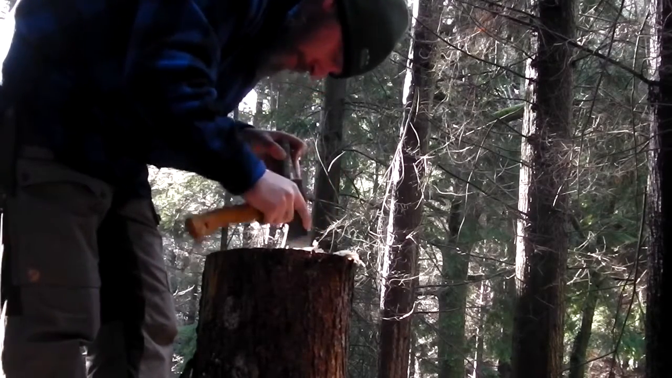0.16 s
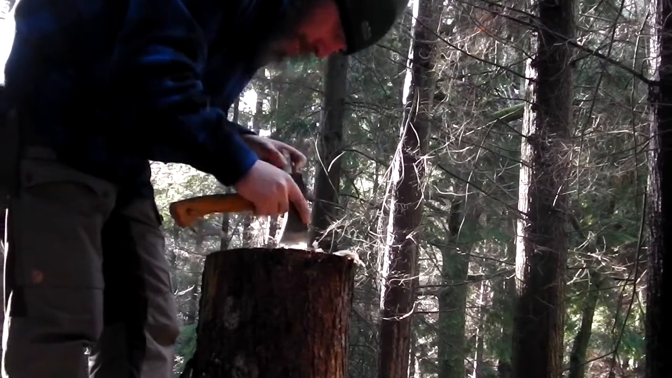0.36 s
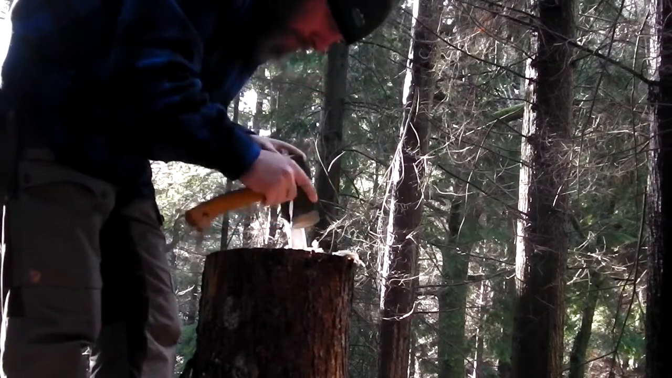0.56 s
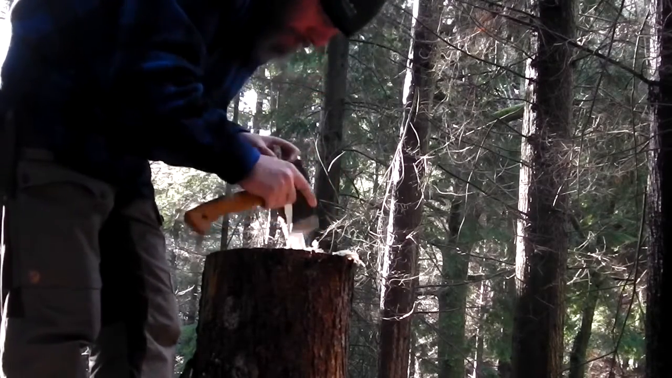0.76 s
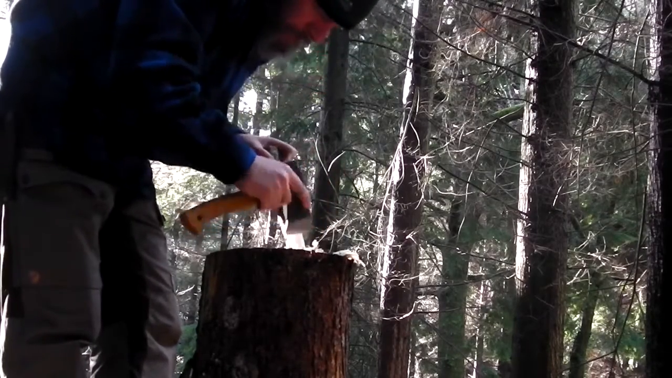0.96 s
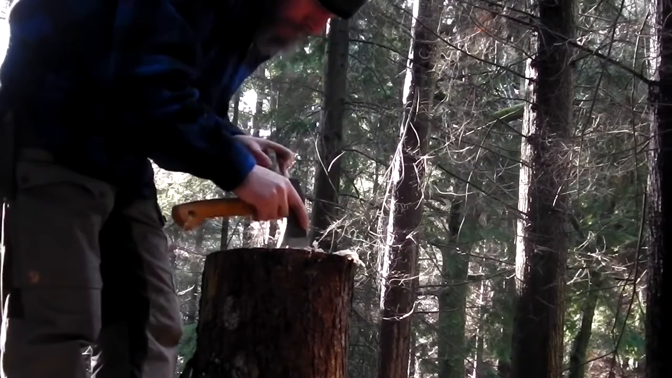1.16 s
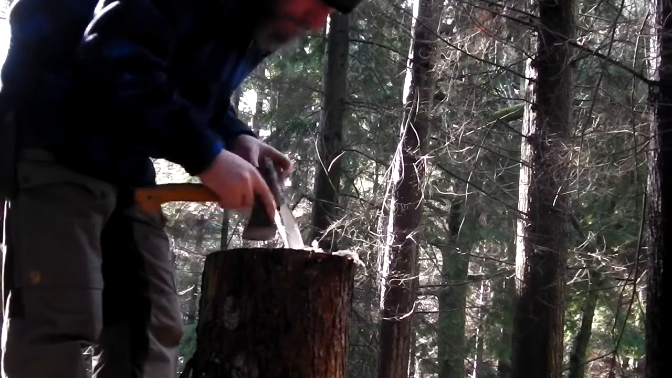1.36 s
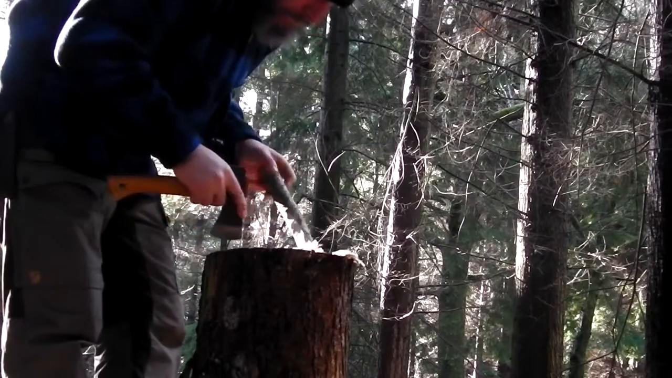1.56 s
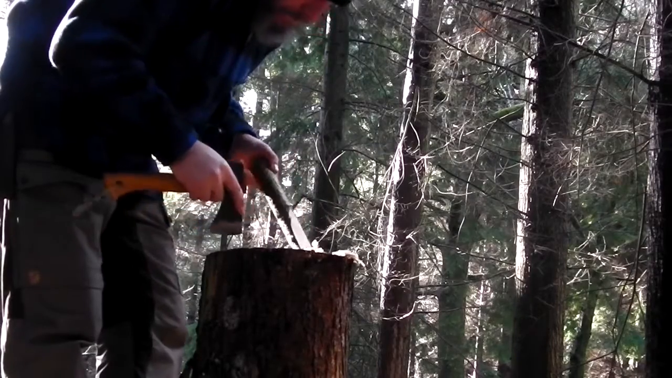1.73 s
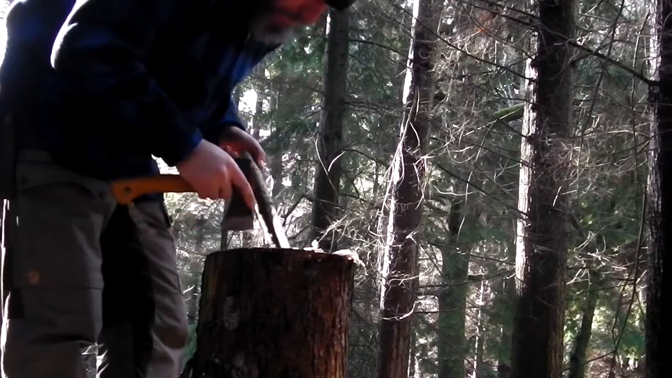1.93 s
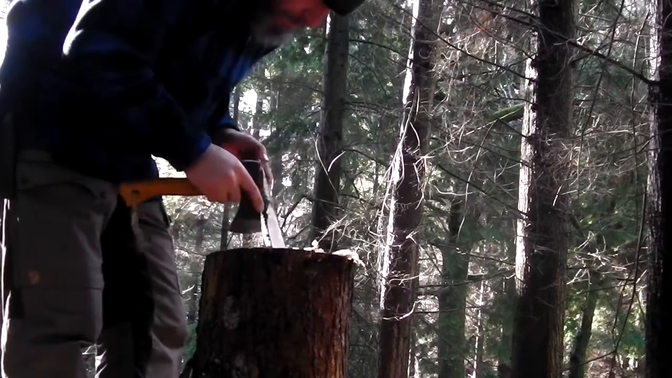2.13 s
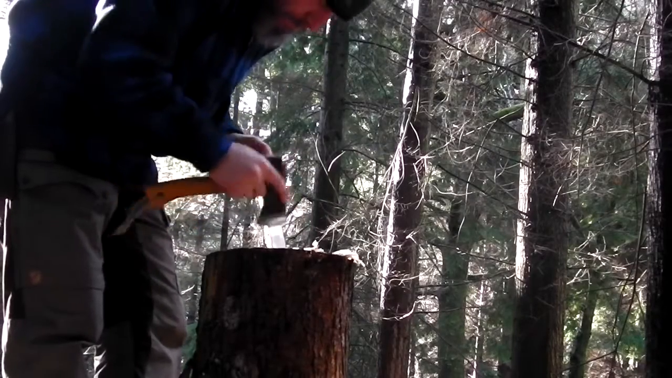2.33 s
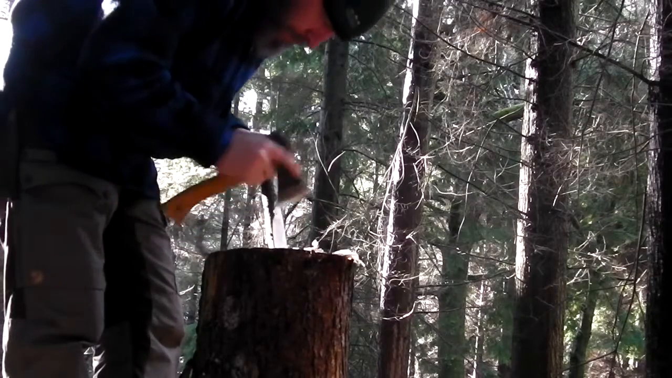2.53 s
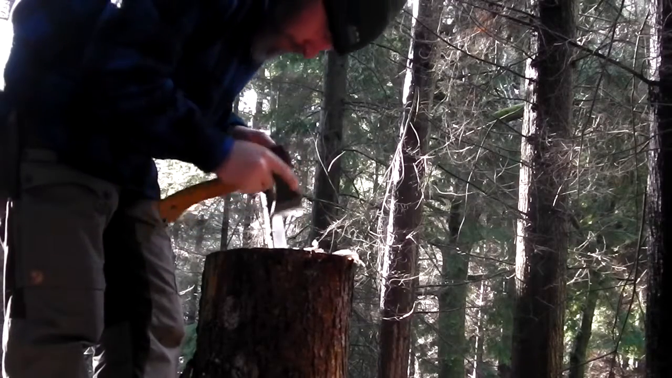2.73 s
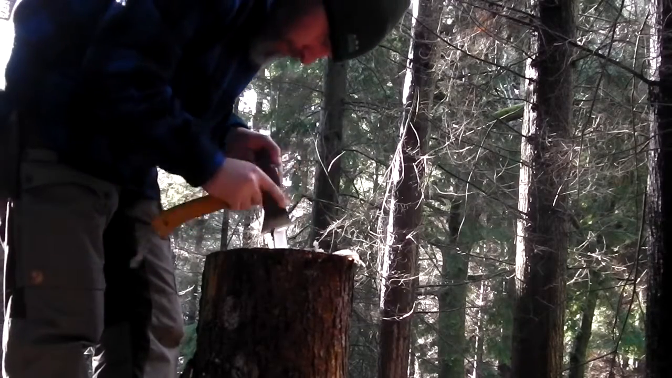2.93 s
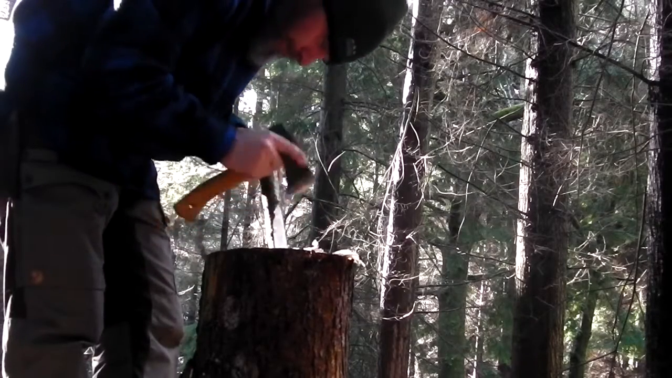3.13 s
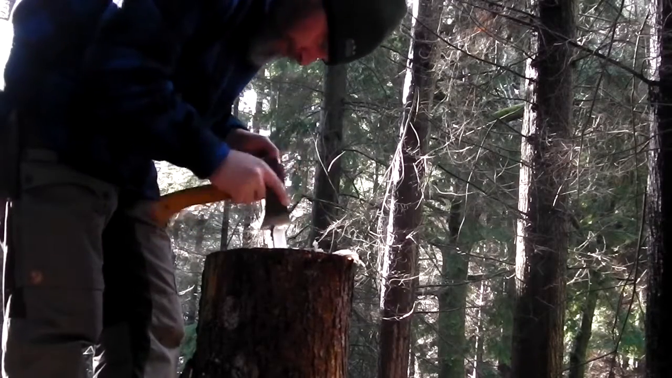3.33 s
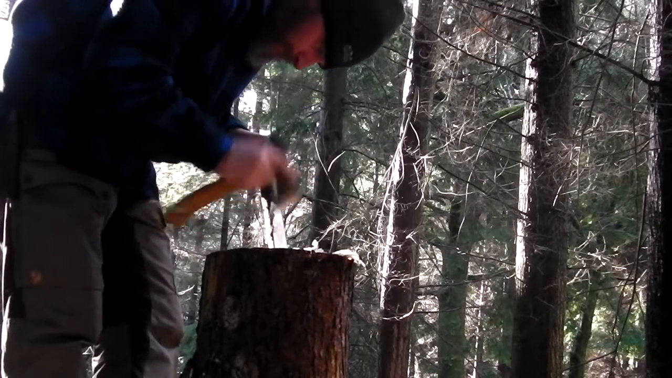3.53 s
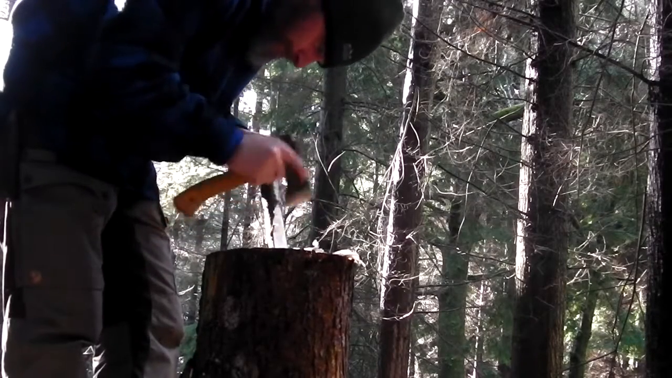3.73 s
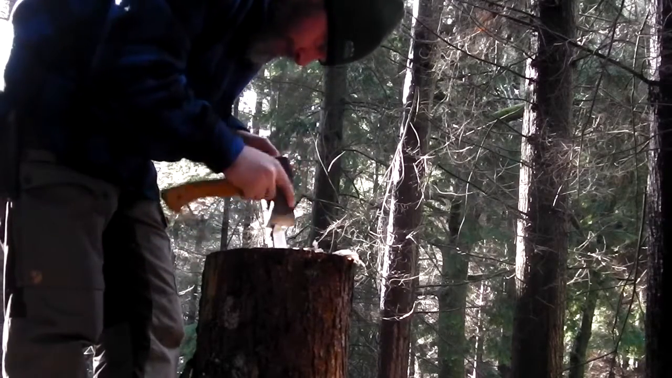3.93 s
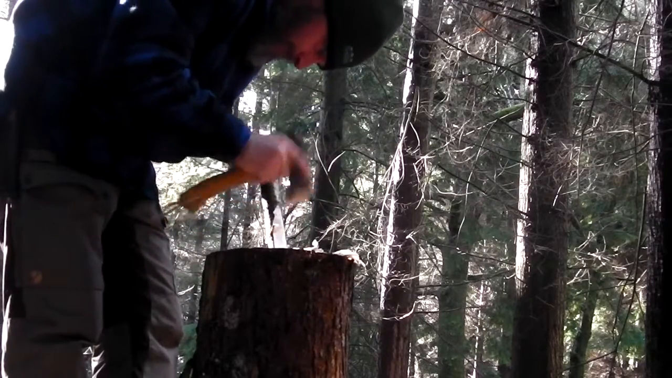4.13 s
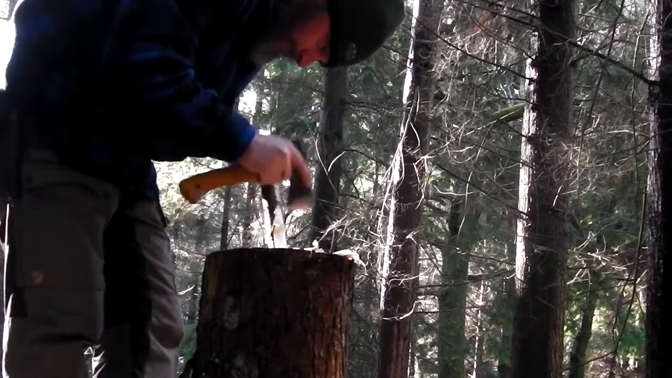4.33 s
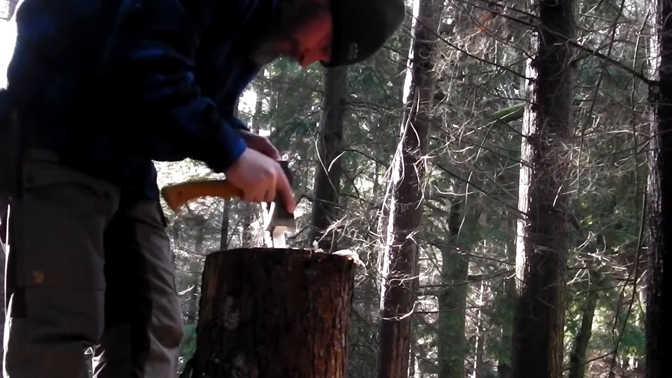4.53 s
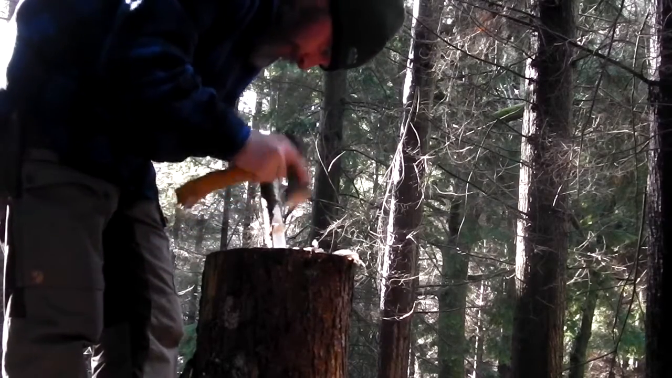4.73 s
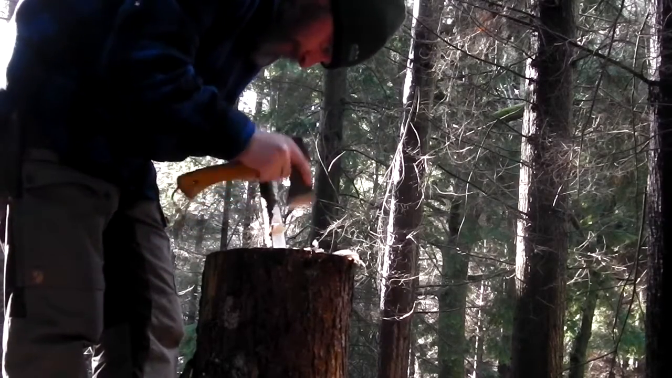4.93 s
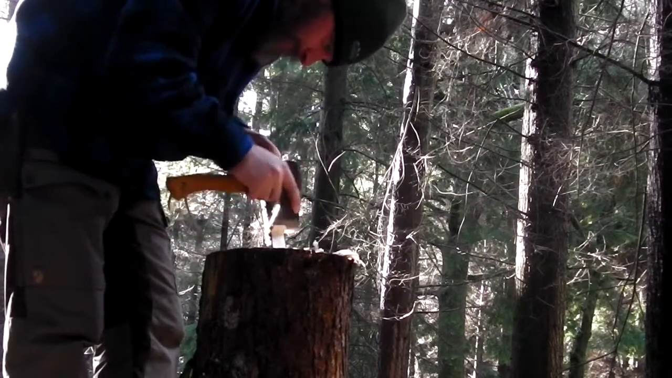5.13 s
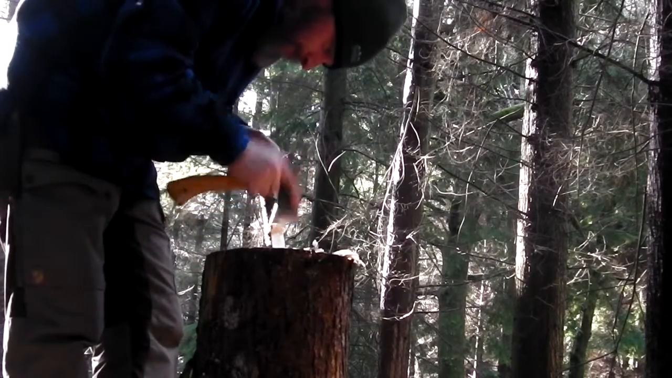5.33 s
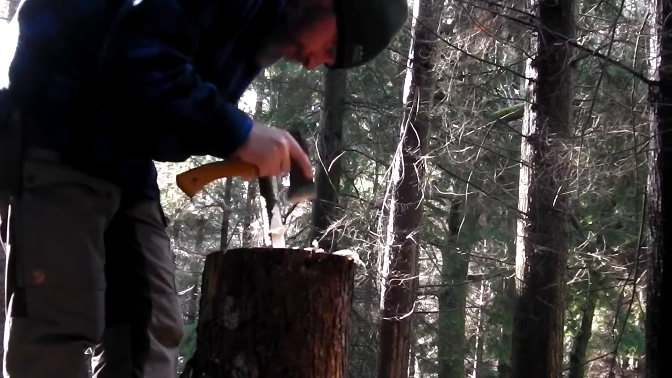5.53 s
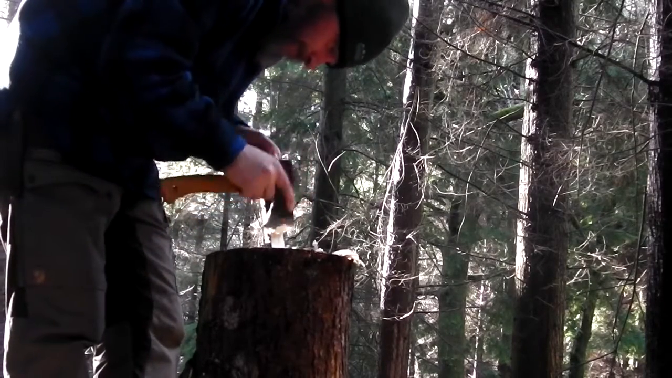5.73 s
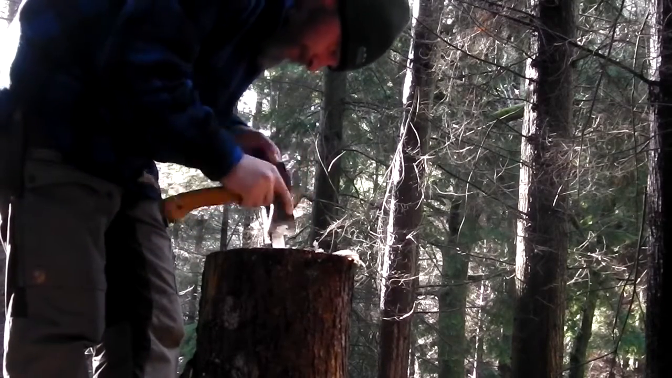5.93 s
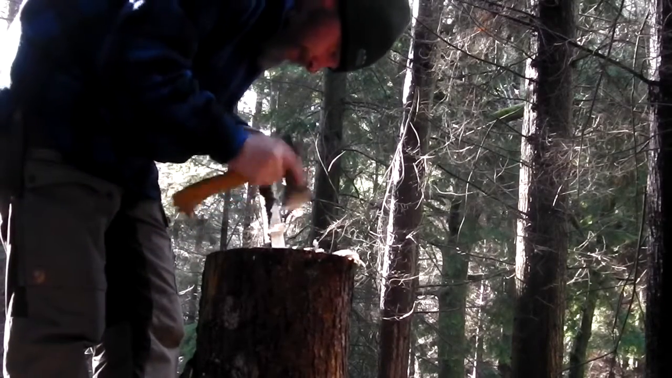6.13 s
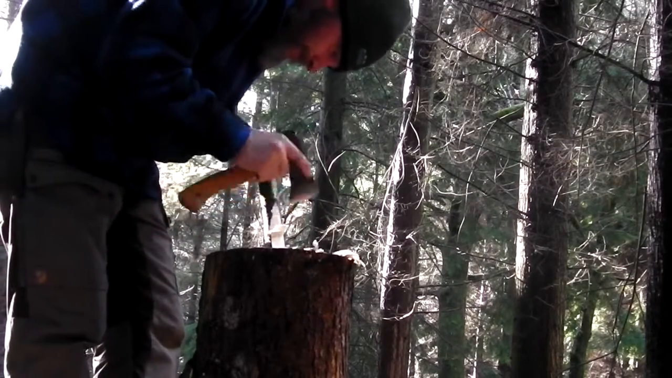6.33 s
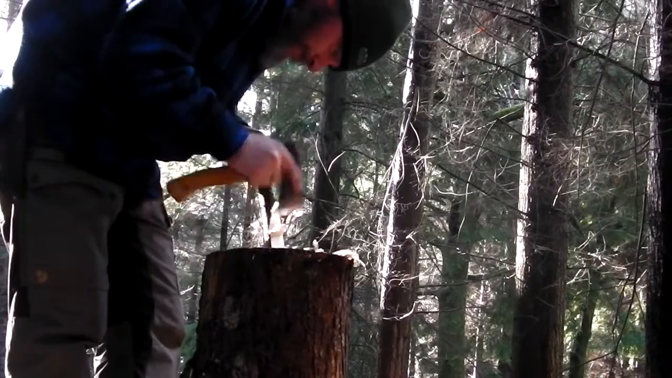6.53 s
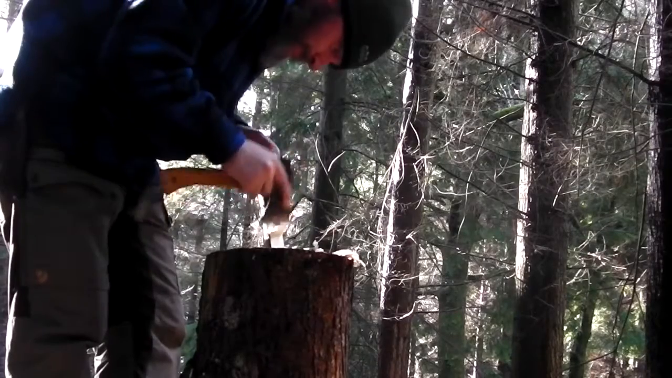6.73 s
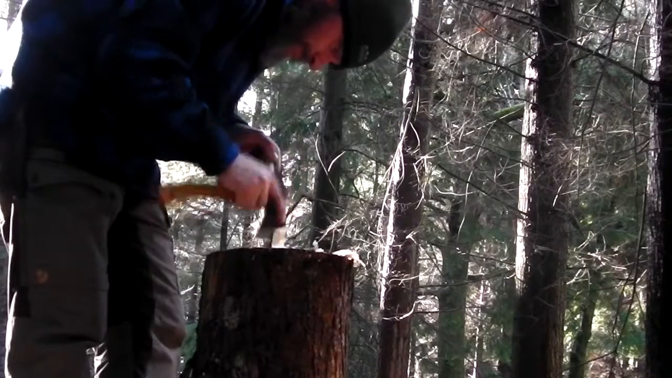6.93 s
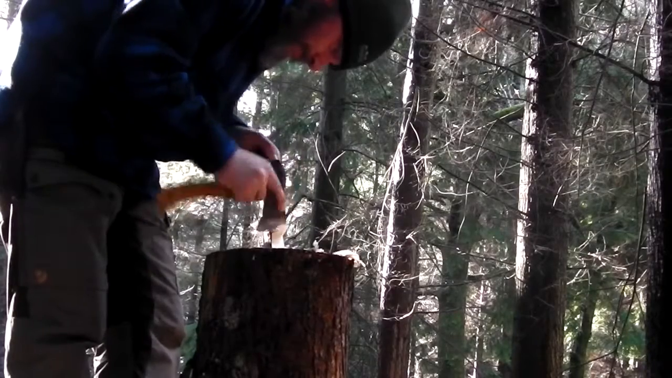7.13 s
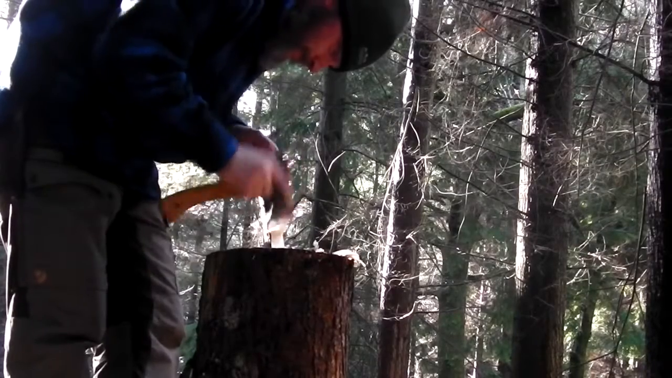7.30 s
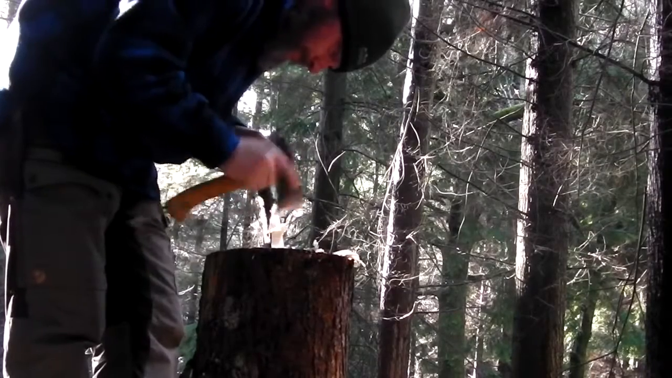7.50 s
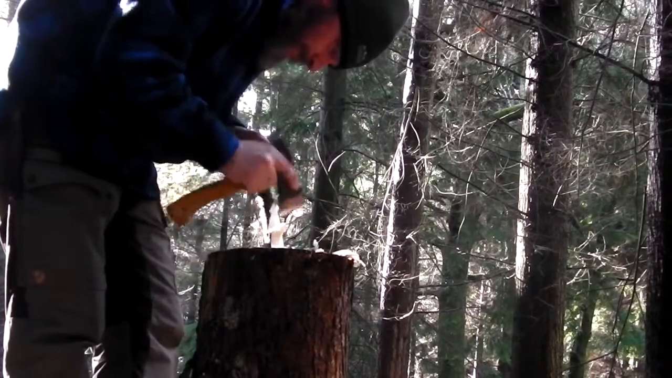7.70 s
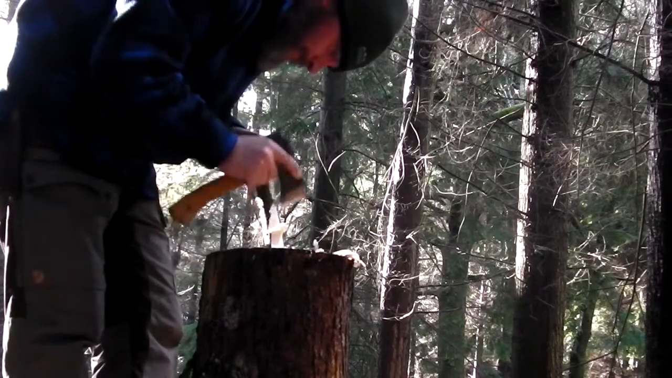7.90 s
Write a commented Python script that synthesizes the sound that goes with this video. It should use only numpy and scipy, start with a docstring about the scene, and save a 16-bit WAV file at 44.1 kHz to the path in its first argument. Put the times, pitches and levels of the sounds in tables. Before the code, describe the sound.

A small hatchet shaves a stick on a log in a forest, about a pace from a stereo microphone. Four light, dry knocks with tearing fibres come first, then a pause. A steady run of strokes follows, quickening and growing into hard clacks near the end, each with a short echo off the trees. Distant traffic and wind hum softly behind, with a few very faint bird whistles.

```python
"""A small hatchet, held near its head, shaves a stick on a log in a wood, a pace from a stereo camera.
Over the hum of far traffic and wind in the crowns come four light strokes: each knocks stick, log and
blade while fibres tear, and ground and trunks send it back. A far bird whistles faintly near 0.8 s and
in the pause that follows. From 2.6 s a steady run of strokes quickens; the arm puffs softly and the bird
calls once more near 4.9 s. The hardest clacks land between 6.4 and 7.6 s, over a swollen traffic drone."""
import sys
import numpy as np
from scipy import signal
from scipy.fft import rfft, irfft, next_fast_len
from scipy.io import wavfile
from scipy.ndimage import uniform_filter1d

SR = 44100
rng = np.random.default_rng(int(sys.argv[2]) if len(sys.argv) > 2 else 0)


def master(y):
    """Save y as 16-bit WAV."""
    cut = np.clip(np.atleast_2d(y).T, -1, 1)
    pcm = np.round(cut * 32767)  # scale
    wavfile.write(sys.argv[1], SR, pcm.astype(np.int16))


N = 355432

# Blade contacts, first bites and the stops just after: start_s, knock_db, clack_db, splinter_db, thud_db
CONTACTS = [(0.134, -25.5, -23, -53, -36), (0.652, -24, -18.5, -56, -36), (0.667, -45, -35, -55, -49),
            (0.675, -55, -39, -50, -51), (0.858, -28.5, -25, -58, -33.5), (0.879, -47, -42, -47, -52),
            (1.043, -30, -25.5, -61, -33.5), (1.071, -50, -43, -54, -42), (1.085, -51, -49, -65, -38),
            (2.614, -21, -31.5, -51, -29), (2.939, -19.5, -20.5, -36.5, -41), (2.943, -31, -25, -56, -35),
            (3.269, -21.5, -19, -37, -31), (3.592, -19.5, -19, -44, -31.5), (3.599, -36, -26, -41, -39.5),
            (3.894, -16, -15.5, -38, -29.5), (4.201, -17.5, -17.5, -42.5, -29.5),
            (4.501, -15.5, -13.5, -46, -40), (4.51, -31, -28, -45, -41), (4.516, -36, -31, -54, -33),
            (4.799, -18, -17.5, -46, -36), (4.813, -35, -27, -48, -28), (5.09, -21.5, -18, -50, -29.5),
            (5.096, -37, -32, -43.5, -57), (5.109, -53, -41, -58, -36.5), (5.373, -18.5, -19, -55, -32),
            (5.388, -29.5, -26.5, -40, -35), (5.394, -36, -30, -45, -35.5), (5.666, -17.5, -14, -46.5, -35),
            (5.68, -36, -20, -45.5, -35), (5.952, -22, -22.5, -44, -31), (5.962, -35, -31, -54, -32.5),
            (6.201, -20, -21, -41.5, -32), (6.212, -24, -21.5, -51, -28.5), (6.449, -18, -7.5, -34.5, -25),
            (6.678, -19, -13.5, -43.5, -29.5), (6.692, -16.5, -19.5, -47, -23), (6.699, -36, -41, -56, -31),
            (6.913, -17.5, -8, -38, -37), (6.926, -27.5, -20.5, -33.5, -27.5),
            (7.129, -15, -4, -28.5, -30.5), (7.354, -17.5, -2.5, -36, -36.5),
            (7.57, -16.5, -6.5, -39.5, -29), (7.779, -17.5, -17.5, -48, -33.5),
            (7.99, -16.5, -11.5, -46.5, -27.5)]
# Modes per layer (stick knock, edge clack, crack, splinter, log thud): pitch_hz, level_db, t60_s
LAYER_MODES = [
    [(662, 8, 0.0096), (780, -19, 0.0047), (930, 14, 0.021), (980, -28, 0.017)],
    [(1700, 2.5, 0.011), (2110, -10, 0.0037), (2024, 7.5, 0.016), (2326, 2.5, 0.025), (2436, 16, 0.0085),
     (2800, -28, 0.0073), (2917, 14, 0.0098), (3320, -3, 0.016)],
    [(3690, -3, 0.0073), (4417, -1, 0.01), (4770, -1.5, 0.0071), (5170, -12, 0.0044), (6040, -6.5, 0.0048),
     (6490, -9.5, 0.013), (7060, -13, 0.0069)],
    [(8600, -3, .003), (10260, -1, .007), (11500, -2, .002), (13000, -4, .002), (14600, -3, .002)],
    [(57.3, -2.5, 0.029), (109, -0.5, 0.043), (169, -14, 0.043), (435, 6.5, 0.012)],
]
# Width and attack of the same five layers: left_minus_right_db, side_share, grit_share, bite_ms
LAYER_VOICING = [(2, 0.033, 0.052, 0.861), (0.5, 0.2, 0.61, 0.915), (-1.7, 0.42, 0.55, 0.41),
                 (3, 0.91, .97, 0.075), (1, 0.16, 0.068, 0.9)]
# How strongly the lowest mode of the clack and of the thud sounds, drifting from stroke to stroke:
# time_s, clack_lift_db, thud_lift_db
LOWEST_MODE_DRIFT = [(.7, 8, 14), (.85, 13.5, 2), (1.1, 23, -8), (4.25, -0.5, 18), (4.5, -2, -19.5)]
# Tone of the scatter off the trunks: frequency_hz, gain_db
TRUNK_TONE = [(500, -22), (1100, 0.5), (1800, 2.5), (2300, 0.5), (3100, -3), (3700, -10), (4800, -7.5),
              (6500, -14.5), (9000, -28.5)]
# Air pushed by the swing: start_s, crest_rms_db
SWING_PUFFS = [(1.869, -59), (4.459, -49.5), (4.722, -55), (5.368, -56), (5.611, -48), (6.601, -48.5),
               (6.887, -44)]
# Far bird calls: start_s, end_s, pitch_hz, level_db
WHISTLES = [(.8, 1.0, 3280, -77), (1.76, 1.96, 2830, -74), (4.85, 5.08, 3120, -67)]
# Tone of the traffic and wind bed: frequency_hz, relative_density_db
BED_TONE = [(15, -59), (25, -14), (43, -14), (64, -1), (149, -6), (185, -11.5), (263, -14.5), (405, -6.5),
            (439, -9), (560, -10), (936, -11), (1840, -19.5), (2760, -19.5), (4610, -21.5), (16000, -29.5)]
# Stereo image of the bed: frequency_hz, left_right_likeness (-1 to 1)
BED_LIKENESS = [(60, 0.26), (130, 0.82), (290, 0.41), (640, 0.59), (1410, 0.00032), (3100, -0.42),
                (6820, -0.51), (15000, -0.18)]
# Swell of the traffic drone, counted up from its quietest point: time_s, level_db
DRONE_SWELL = [(0.0, -65), (6.87, -58), (8.06, -61)]

CRACK_FROM_CLACK, CRACK_LIFT_DB = 0.5, 0.4  # the crack is part edge, part fibres
TEAR_MS, HARD_FROM_DB, QUICKER_MS_PER_DB = 2.68, -14, 0.18  # a hard clack shortens the tear
SPLINTER_STRETCH = 1.97  # the finest fibres snap this many times longer
GROUND_MS, GROUND_DB, GROUND_SPREAD_MS = 4.3, -10.5, 3
TRUNKS_DB, TRUNKS_T60_S, TRUNKS_RISE_S = -22, 0.58, 0.0033
SCATTER_FROM_HZ = 1400  # longer waves bend round the thin trunks
THROB_HZ, THROB_DB = 21, 5
BED_DB, BED_PAN_DB = -54, 0.5


def hatchet():
    """Each contact is a short push plus the grit of tearing fibres, rung through five layers of modes."""
    out = np.zeros((2, N + SR))
    t = np.arange(SR // 25) / SR
    push = np.sin(np.pi * np.clip(t / 0.00021, 0, 1))
    push /= np.sqrt(np.sum(push ** 2))
    drift_s, drift_clack_db, drift_thud_db = np.transpose(LOWEST_MODE_DRIFT)
    for start_s, knock, clack, splinter, thud in CONTACTS:
        crack = CRACK_FROM_CLACK * clack + (1 - CRACK_FROM_CLACK) * splinter + CRACK_LIFT_DB
        levels_db = [knock, clack, crack, splinter, thud]
        tear_s = max(TEAR_MS - QUICKER_MS_PER_DB * max(clack - HARD_FROM_DB, 0), .3) / 1000
        spans_s = [tear_s, tear_s, tear_s, tear_s * SPLINTER_STRETCH, tear_s]
        # few large and many small fibre snaps
        snaps = rng.standard_normal((2, len(t))) * undb(3.5 * rng.exponential(size=len(t)))
        jitters = rng.standard_normal((len(LAYER_MODES), 8, 2))
        clack_lift_db = np.interp(start_s, drift_s, drift_clack_db)
        thud_lift_db = np.interp(start_s, drift_s, drift_thud_db)
        lifts_db = [0, clack_lift_db, 0, 0, thud_lift_db]
        onset = int((start_s - .0003) * SR)  # the bite starts just before it is heard
        layers = zip(LAYER_MODES, LAYER_VOICING, levels_db, jitters, lifts_db, spans_s)
        for modes, voicing, level_db, jitter, lift_db, span_s in layers:
            pan_db, side_share, grit_share, bite_ms = voicing
            grit = snaps * t / span_s * np.exp(-t / span_s * 1.66)
            grit /= np.sqrt(np.sum(grit ** 2) / 2)
            body = ring(modes, jitter, bite_ms / 1000, lift_db)
            mid = np.convolve((1 - grit_share) * push + grit_share * grit[0], body)
            mid /= np.max(np.abs(mid))
            side = np.convolve(grit[1], body)
            side *= side_share / np.max(np.abs(side))
            pair = np.array([(mid + side) * undb(pan_db / 2), (mid - side) * undb(-pan_db / 2)])
            out[:, onset:onset + len(mid)] -= undb(level_db) * pair
    return out[:, :N]


def ring(modes, jitter, bite_s, lowest_lift_db, detune=.012, uneven_db=2.2):
    """Modes swell as the edge bites, then ring out; each contact weights and tunes them a little anew."""
    t = np.arange(SR // 12) / SR
    hz, db, t60_s = np.transpose(modes)[:, :, None]
    db = db + uneven_db * jitter[:len(modes), 1:] + lowest_lift_db * (hz == hz.min())
    hz = hz * (1 + detune * jitter[:len(modes), :1])
    # wood swallows a ring within a few dozen cycles, steel less
    t60_s = np.minimum(t60_s, np.where(hz < 3500, 27 / hz, 1))
    tones = np.sin(2 * np.pi * hz * (t - 2 * bite_s))  # in step at the height of the force
    attack = 1 - np.exp(-(t / bite_s) ** 2)
    return attack * np.sum(undb(db) * tones * 1000 ** (-t / t60_s), 0)


def ground_bounce(chops):
    """The rough ground answers each chop with one blurred reflection."""
    t_ms = 1000 * np.arange(SR // 40) / SR
    lateness = (t_ms - GROUND_MS) / GROUND_SPREAD_MS
    smear = rng.standard_normal((1, len(t_ms))) * (lateness > 0) * np.exp(-np.abs(lateness))
    smear /= np.sqrt(np.sum(smear ** 2))
    return undb(GROUND_DB) * signal.fftconvolve(chops, smear, axes=1)[:, :N]


def trunk_scatter(chops):
    """The trunks scatter the chops' treble into a thin tail that builds up and dies away."""
    t = np.arange(SR) / SR
    tail = rng.standard_normal((2, SR)) * undb(3 * wander(150)[:SR])  # single near trunks stand out
    envelope = (1 - np.exp(-(t / TRUNKS_RISE_S) ** 2)) * 1000 ** (-t / TRUNKS_T60_S)
    tail = (tail + .5 * tail[::-1]) * envelope  # crossfeed narrows the image
    tail = irfft(rfft(tail) * undb(curve_at(np.arange(SR // 2 + 1), TRUNK_TONE)), SR)
    tail *= undb(TRUNKS_DB) / np.sqrt(np.sum(tail ** 2) / 2)
    treble = signal.sosfilt(signal.butter(2, SCATTER_FROM_HZ, "high", fs=SR, output="sos"), chops)
    # every trunk faces another side of the stick, so the sum keeps a blow's strength but not its modes
    send = treble.mean(0, keepdims=True) * rng.choice([-1., 1.], size=N)
    return signal.fftconvolve(send, tail, axes=1)[:, :N]


def arm_swing(rise_s=0.028):
    """Soft low puffs of air as arm and sleeve come down."""
    t = np.arange(N) / SR
    whoosh = signal.sosfilt(signal.butter(2, [90, 190], "band", fs=SR, output="sos"), rng.standard_normal(N))
    envelope = sum(undb(db) * np.exp(-((t - s - rise_s) / rise_s) ** 2) for s, db in SWING_PUFFS)
    return whoosh / np.std(whoosh) * envelope


def far_bird():
    """Thin one-note whistles that pulse, and waver with the distance."""
    t, out = np.arange(N) / SR, 0
    for start_s, end_s, pitch_hz, level_db in WHISTLES:
        gate = np.clip(np.minimum(t - start_s, end_s - t) / 0.01, 0, 1)
        wavering_hz = pitch_hz * (1 + .003 * wander(40))
        tone = np.sin(2 * np.pi * np.cumsum(wavering_hz) / SR)
        throb_db = THROB_DB * np.sin(2 * np.pi * THROB_HZ * (t - start_s))
        out += undb(level_db + 3 * wander(30) + throb_db) * gate * tone
    return out


def traffic_and_wind(flicker_db=.7, drone_hz=128):
    """A bed of far noise: each octave flickers on its own, and the traffic drone's octave swells."""
    size = next_fast_len(N)
    hz = np.arange(size // 2 + 1) * SR / size
    likeness = np.clip(curve_at(hz, BED_LIKENESS), -.95, .95)
    noise = rfft(rng.standard_normal((2, size))) * undb(curve_at(hz, BED_TONE))
    mid, side = noise * np.sqrt([1 + likeness, 1 - likeness])
    spectrum = np.array([mid + side, mid - side]) * undb(BED_DB) / np.std(irfft(mid, size))
    time_s, drone_db = np.transpose(DRONE_SWELL)
    swell_db = np.interp(np.arange(N) / SR, time_s, drone_db - np.min(drone_db))
    out = 0
    for centre_hz in 32 * 2 ** np.arange(10):
        band = np.cos(np.pi / 2 * np.clip(np.log2((hz + 1) / centre_hz), -1, 1)) ** 2
        ride_db = flicker_db * wander(21) + swell_db * (centre_hz == drone_hz)
        out += undb(ride_db) * irfft(spectrum * band, size)[:, :N]
    return out * undb(np.array([[BED_PAN_DB], [-BED_PAN_DB]]) / 2)


def undb(db):
    """Gain of a dB value."""
    return 10 ** (np.asarray(db) / 20)


def curve_at(hz, table):
    """Read a curve of frequency_hz, value points on a log-frequency axis."""
    points_hz, values = np.transpose(table)
    return np.interp(np.log(hz + 1), np.log(points_hz + 1), values)


def wander(rate_hz):
    """Smooth random modulation: sample-and-hold, slewed twice; spread near 1."""
    hold = int(SR / rate_hz)
    steps = np.repeat(rng.standard_normal(N // hold + 1), hold)
    return uniform_filter1d(uniform_filter1d(steps, hold), hold)[:N]


def scene():
    """Chops up front, their echoes and the swing around them, the bed and the bird behind."""
    chops = hatchet()
    echoes = ground_bounce(chops) + trunk_scatter(chops)
    return chops + echoes + arm_swing() + traffic_and_wind() + far_bird()


def record(dry, dip_hz=7690, dip_width_hz=1100, dip_depth=0.67, top_hz=15900):
    """The camera body dulls one treble band; the deepest bass and the very top are cut."""
    low_cut = signal.sosfilt(signal.butter(1, 40, "high", fs=SR, output="sos"), dry)
    dip_band = signal.lfilter(*signal.iirpeak(dip_hz, dip_hz / dip_width_hz, fs=SR), low_cut)
    high_cut = signal.ellip(10, .2, 60, top_hz, fs=SR, output="sos")
    return signal.sosfilt(high_cut, low_cut - dip_depth * dip_band)


dry = scene()
out = record(dry)
master(out)
```